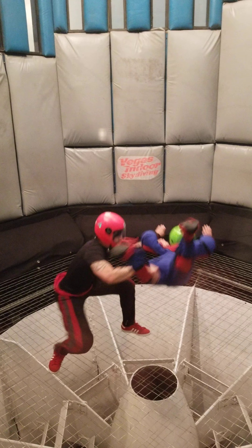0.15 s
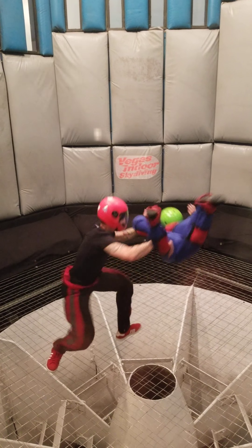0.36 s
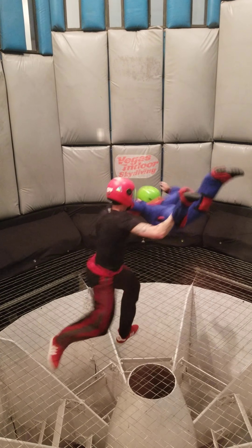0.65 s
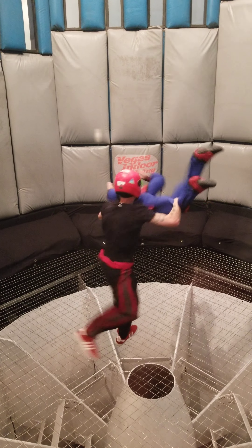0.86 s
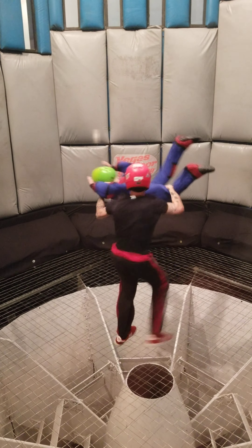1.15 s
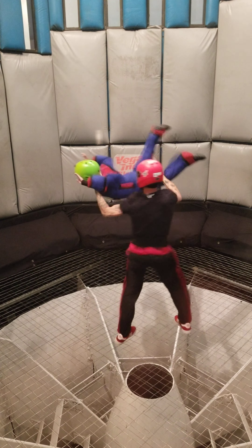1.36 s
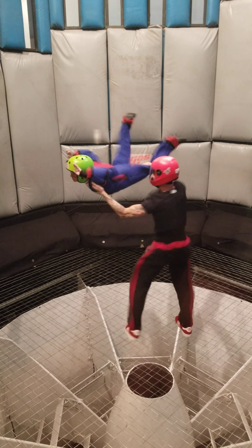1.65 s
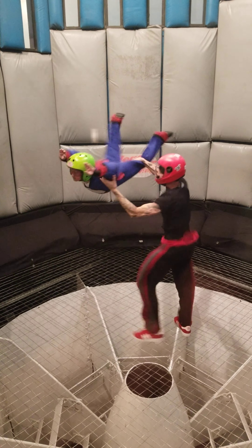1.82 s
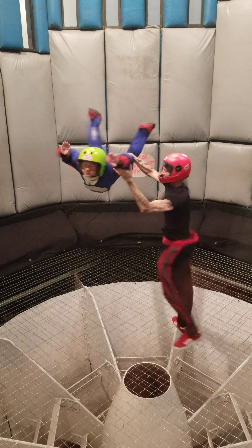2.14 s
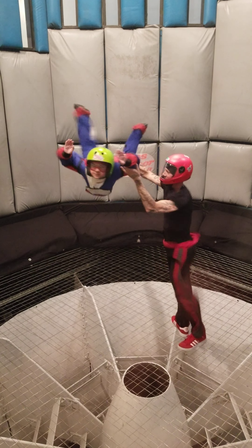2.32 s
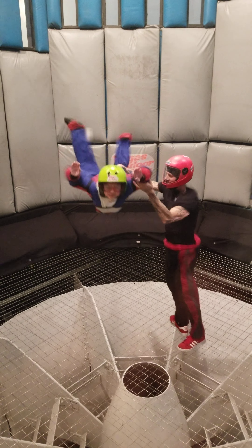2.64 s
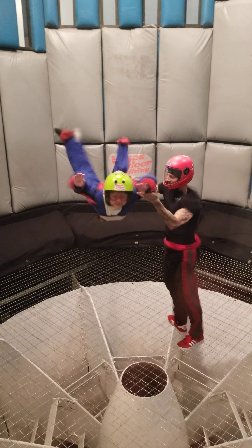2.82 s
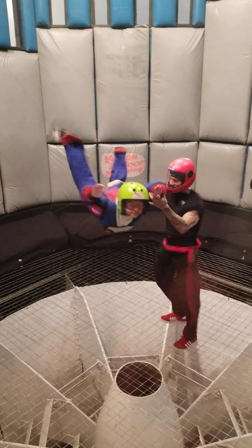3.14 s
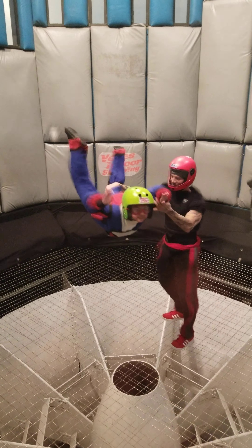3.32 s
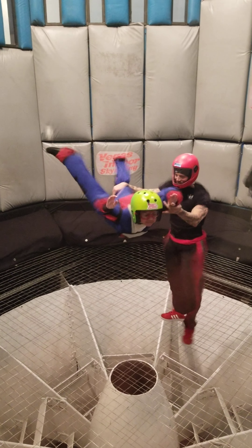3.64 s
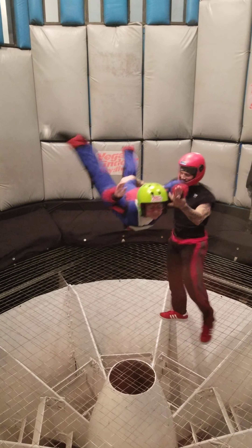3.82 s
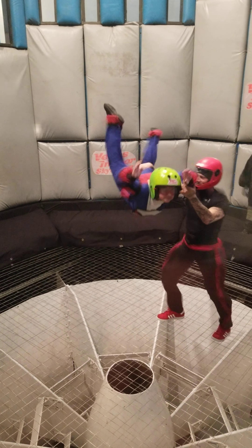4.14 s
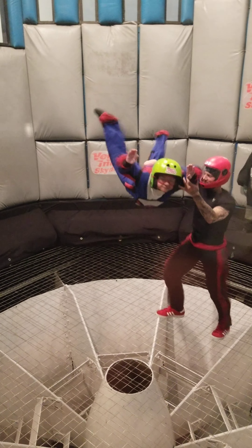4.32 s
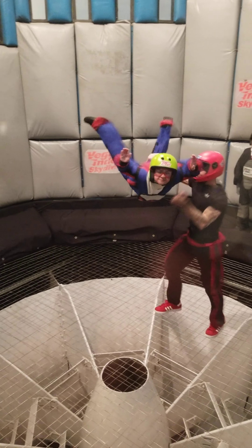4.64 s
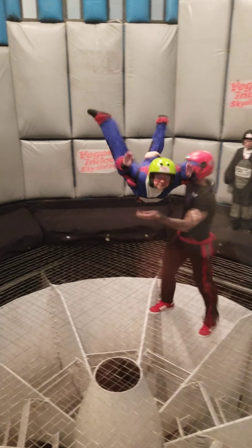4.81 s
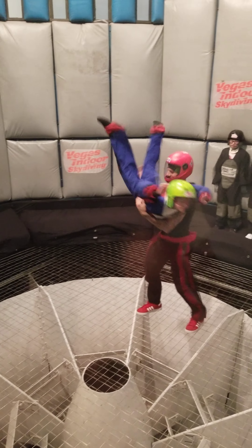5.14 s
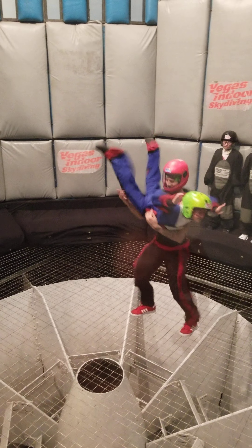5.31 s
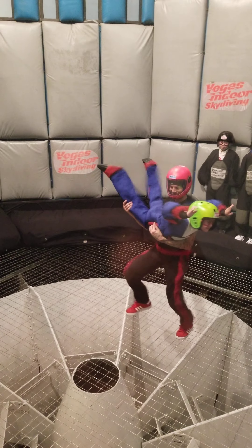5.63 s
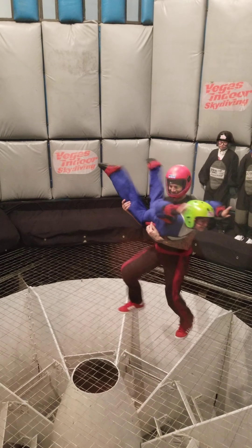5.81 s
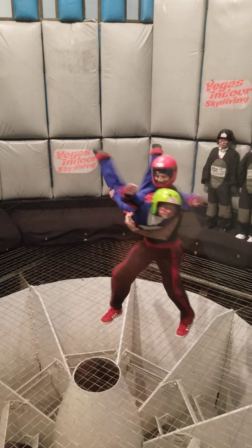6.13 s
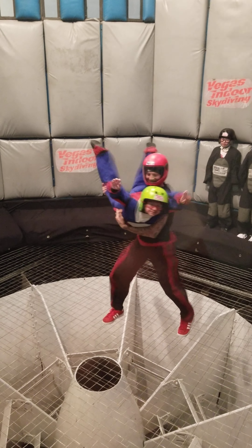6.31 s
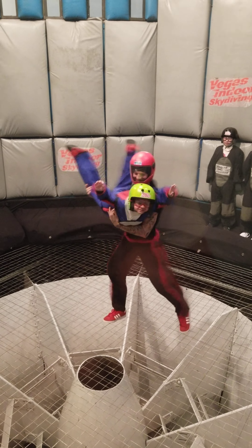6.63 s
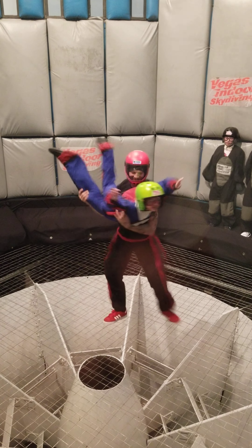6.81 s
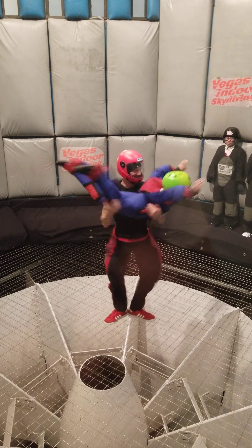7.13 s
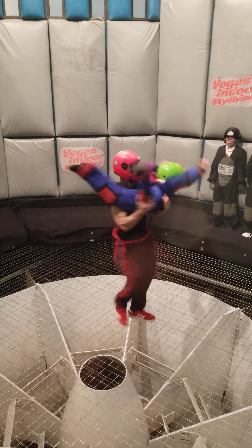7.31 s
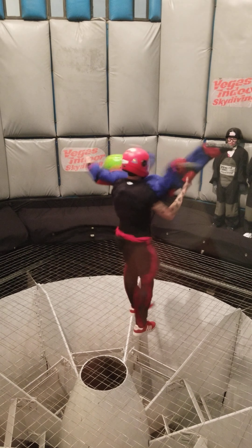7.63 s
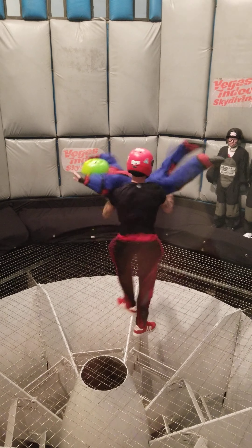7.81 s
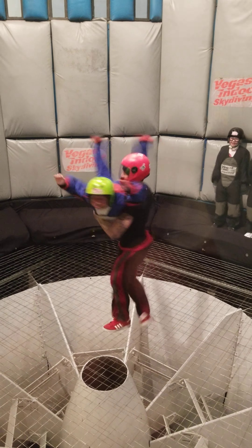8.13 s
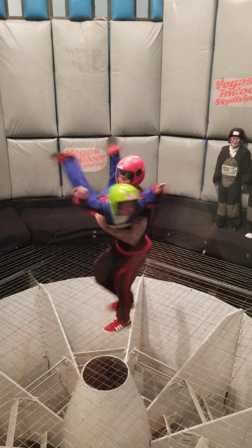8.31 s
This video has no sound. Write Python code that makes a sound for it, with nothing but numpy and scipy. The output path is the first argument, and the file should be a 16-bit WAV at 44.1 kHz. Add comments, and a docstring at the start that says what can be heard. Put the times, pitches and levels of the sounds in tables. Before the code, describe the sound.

Large fans in an indoor vertical wind tunnel make a deep, throbbing hum under a loud, steady rush of air.

```python
"""Inside a vertical wind tunnel

A big propeller turns under the floor net of a padded flight chamber. Its blades beat out a deep hum
whose overtones swell and fade as two flyers move through the air column. Turbulence roars around the
hum, and air rushes through the net and past the suits. Midway, the listener moves to a second spot."""
import sys
import numpy as np
from scipy import signal
from scipy.fft import rfft, irfft, next_fast_len
from scipy.io import wavfile
from scipy.ndimage import uniform_filter1d, minimum_filter1d

SR = 44100
rng = np.random.default_rng(int(sys.argv[2]) if len(sys.argv) > 2 else 0)


def waveform_to_disk(signal):
    """Save audio, clipped to [-1, 1], as 16-bit WAV at the path in sys.argv[1]."""
    frames = np.transpose(np.atleast_2d(signal))
    scaled = np.clip(frames, -1, 1) * 32767
    samples = np.round(scaled).astype(np.int16)
    wavfile.write(sys.argv[1], SR, samples)


N = 373086


def from_db(db):
    """Amplitude ratio of a level."""
    return 10 ** (np.asarray(db) / 20)


def unit_power(x):
    """Normalisation to a mean square of 1."""
    return x / np.sqrt(np.mean(np.abs(x) ** 2) + 1e-20)


def in_time(points):
    """Linear interpolation in time, sample by sample."""
    return np.interp(np.arange(N) / SR, *np.transpose(points))


def at_hz(points, hz):
    """Interpolation on a log-frequency axis."""
    known_hz, values = np.transpose(points)
    return np.interp(np.log(np.maximum(hz, 1)), np.log(known_hz), values)


def drift(rate_hz):
    """Low-pass Gaussian noise: a slow fluctuation of unit power."""
    hop = 40
    pole = np.exp(-2 * np.pi * hop * rate_hz / SR)
    slow = signal.lfilter([1], [1, -2 * pole, pole * pole], rng.standard_normal(N // hop + 2002))[2000:]
    return np.interp(np.arange(N) / hop, np.arange(len(slow)), unit_power(slow))


def panned(balance_db):
    """Interaural level difference as two gains whose mean is 1."""
    gains = from_db(np.array([[.5], [-.5]]) * balance_db)
    return gains / gains.mean(axis=0)


def way_moved(pace, start_s=3.73):
    """Standing waves make the sound depend on position: 0 at the first spot, 1 at the second."""
    return np.clip(pace * (np.arange(N) / SR - start_s) / 1.34, 0, 1)


# Level of the air noise, left ear minus right: f/Hz, difference/dB
EAR_BALANCE = [(50, 4), (200, 3), (400, 7), (560, 1.5), (760, 6), (1050, 4), (1380, -2.5), (1600, 1),
               (2150, 1), (2700, 3.5), (3150, 1), (4200, 6.5), (5900, 7), (6500, 3), (10000, 1)]
# Likeness of the two ears: f/Hz, correlation coefficient
EAR_CORRELATION = [(100, .97), (200, .93), (300, .72), (450, .48), (680, .2), (1020, -.16), (1520, -.17),
                   (2280, 0), (3400, .11), (5100, .08)]
def air_noise(spectrum):
    """Partial coherence: coloured noise, alike at both ears in the bass and unrelated in the treble."""
    size = next_fast_len(N)
    hz = np.fft.rfftfreq(size, 1 / SR)
    mid, side = rfft(rng.standard_normal((2, size)))
    alike = at_hz(EAR_CORRELATION, hz)
    ears = np.sqrt(1 + alike) * mid + np.sqrt(1 - alike) * side * [[1], [-1]]
    top_hz = spectrum[-1][0]
    colour = from_db(at_hz(spectrum, hz)) / np.maximum(1, hz / top_hz) ** 6
    noise = irfft(ears * panned(at_hz(EAR_BALANCE, hz)) * colour, size)[:, :N]
    return noise / np.std(noise.mean(axis=0))


def airstream(spectrum, level_db, blade_angle, throb, gust_db):
    """Amplitude modulation: turbulent noise gusts, and pulses with every passing blade."""
    return air_noise(spectrum) * from_db(level_db + gust_db * drift(9.6)) * (1 + throb * np.cos(blade_angle))


def walls(sound, echo_db, count=8):
    """Comb filtering: weak reflections from the padded walls reach each ear with different delays."""
    lags = (rng.uniform(.002, .022, (2, count)) * SR).astype(int)
    echoes = [sum(np.roll(ear, lag) for lag in ear_lags) for ear, ear_lags in zip(sound, lags)]
    return sound + from_db(echo_db) * np.array(echoes)


# Spectrum of the fine hiss: f/Hz, relative level/dB
FINE_HISS_SPECTRUM = [(6500, -11.5), (8300, -6), (9700, -2), (11200, -0.5), (13000, -4), (14000, -2),
                      (15500, -6.5)]
def fine_hiss(flow_db, moved, blade_angle):
    """Flow noise has a faint tail in the high treble."""
    level_db = flow_db - 25 + .54 * moved
    return airstream(FINE_HISS_SPECTRUM, level_db, blade_angle, throb=.046, gust_db=.5)


# Resonances of the air stream: f/Hz, half-width/Hz, relative level/dB
WHISTLE_MODES = [(3362, 79, 1.5), (3610, 200, -3)]
def whistle(flow_db, moved, blade_angle):
    """Resonance: the stream sings in narrow bands, louder at the second spot."""
    hz = np.geomspace(20, SR / 2, 1500)
    gain = sum(from_db(db) / (1 + ((hz - centre) / width) ** 2) for centre, width, db in WHISTLE_MODES)
    spectrum = np.column_stack([hz, 20 * np.log10(gain)])
    return airstream(spectrum, flow_db - 12.5 + 5.3 * moved, blade_angle, throb=.033, gust_db=.5)


# Spectrum of the hiss: f/Hz, relative level/dB
HISS_SPECTRUM = [(2000, -26), (2500, -9), (2800, -5.5), (3150, -1.5), (3500, -2), (3900, -3.5),
                 (4200, -2.5), (4800, -12), (5400, -13.5), (5950, -18), (6450, -16.5), (7300, -24.5),
                 (8200, -38.5), (11000, -58.5)]
def hiss(flow_db, moved, blade_angle):
    """Flow noise at the net and the suits: the treble band."""
    return airstream(HISS_SPECTRUM, flow_db - 4 - .8 * moved, blade_angle, throb=.038, gust_db=.6)


# Spectrum of the rush: f/Hz, relative level/dB
RUSH_SPECTRUM = [(600, -27), (850, -1.5), (1020, -1.5), (1130, -1.5), (1350, -0.5), (1500, 2.5),
                 (1700, -4.5), (2000, -7), (2400, -12.5), (3000, -16.5), (4500, -45)]
def rush(flow_db, moved, blade_angle):
    """Flow noise at the net and the suits: the middle band."""
    return airstream(RUSH_SPECTRUM, flow_db - 3 - .5 * moved, blade_angle, throb=.13, gust_db=.14)


# Spectrum of the roar: f/Hz, relative level/dB
ROAR_SPECTRUM = [(20, -15), (45, -14.5), (75, -3), (120, -2.5), (150, 1), (200, 6.5), (255, 2), (330, -8),
                 (420, -2.5), (500, -7), (590, -7.5), (720, -9.5), (830, -17.5), (1100, -28.5)]
def roar(turbulence_db, blade_angle):
    """Turbulence round the blades radiates low broadband noise."""
    return airstream(ROAR_SPECTRUM, turbulence_db + 4.5, blade_angle, throb=.19, gust_db=.47)


def eddies(hz, flutter_hz=3.88):
    """Scattering by eddies gives a tone a random amplitude and phase at each ear."""
    alike = at_hz(EAR_CORRELATION, hz)
    mid, side = (unit_power(drift(flutter_hz) + 1j * drift(flutter_hz)) for _ in range(2))
    return mid + np.sqrt((1 - alike) / (1 + alike)) * side * [[1], [-1]]


# Blade harmonics: order, steady level/dB at the first spot, at the second, left minus right/dB,
# left phase lead/rad, scattered level/dB re turbulence
HARMONICS = [(1, -37.5, -43, 4.2, 0, -18), (2, .2, 0, 3.9, -.08, -9), (3, -20.7, -15.4, 3.5, 0, -1.5),
             (4, 0, -.8, 1, .1, -4), (5, -30.5, -25.2, -2, .1, -3), (6, -36, -25.2, 10, -1.1, -13),
             (7, -35.5, -37.5, 10, .3, -10.5), (8, -39, -34, 6.8, 0, -10.5), (9, -50, -42, 9, .4, -18),
             (10, -37, -39, 0, .7, -19), (11, -43.5, -40, .8, .3, -19), (12, -43, -41.3, 5.5, .6, -19),
             (13, -45.5, -41, 8, 2.2, -19), (14, -54, -52, 4, 1.5, -26), (16, -59, -54, 2, 1.5, -29)]
# Deep hum, added to the steady level of order 2: t/s, level/dB
HUM_ENVELOPE = [(0.0, -10), (0.69, -9.0), (3.18, -10), (3.78, -10.5), (6.28, -16), (6.71, -13.5),
                (7.01, -14.5), (8.02, -12.5), (8.46, -13.5)]
# Its octave, added to the steady level of order 4: t/s, level/dB
OCTAVE_ENVELOPE = [(0.0, -18.6), (0.83, -23.5), (1.31, -14.5), (1.61, -16.5), (2.36, -30), (2.86, -13),
                   (3.34, -18.9), (3.63, -15.5), (3.87, -18), (5.94, -30), (6.1, -19), (6.85, -29),
                   (7.05, -15.5), (7.81, -22.5), (8.02, -13.5), (8.46, -22)]
def blade_hum(turbulence_db, blade_angle, blade_hz):
    """Periodic pressure dips, one per blade, form a harmonic series of steady plus scattered parts."""
    envelopes_db = {2: in_time(HUM_ENVELOPE), 4: in_time(OCTAVE_ENVELOPE)}
    surge_db = turbulence_db - turbulence_db.mean()
    hum = np.zeros((2, N))
    for order, first_db, second_db, balance_db, lead_rad, scatter_db in HARMONICS:
        moved = way_moved(pace=order / 2)  # shorter waves change over sooner
        spot_db = first_db + moved * (second_db - first_db)
        # higher orders grow with the turbulence that the blades chop
        chopped_db = np.clip(.16 * (order - 2), 0, 1) * surge_db
        swell_db = envelopes_db.get(order, chopped_db + .87 * drift(.8))
        steady = from_db(spot_db + swell_db)
        scattered = from_db(turbulence_db + scatter_db) * eddies(order * blade_hz[0])
        # moving bodies sway the sound paths; reflections smear the dip, more at the first spot
        sway = order * .09 * drift(.45)
        smear = order * .29 * (1 - way_moved(pace=.89)) * rng.normal() + .44 * rng.normal()
        tone = (steady + scattered) * np.exp(1j * (order * blade_angle + sway + smear))
        ears = np.real(tone * np.exp(1j * lead_rad * np.array([[.5], [-.5]])))
        hum -= np.sqrt(2) * panned(balance_db) * ears
    return hum


# Blade-passing frequency: t/s, f/Hz
BLADE_RATE = [(0, 54.52), (4.15, 54.52), (4.75, 54.1), (5.7, 54.04), (8.46, 54.08)]
# Turbulence round the blades: t/s, level/dB
TURBULENCE_LEVEL = [(0.0, -30.5), (1.93, -27), (2.32, -29), (2.62, -26.5), (4.31, -28), (4.97, -30),
                    (5.22, -27), (6.81, -24.9), (8.46, -26)]
# Air stream through the net: t/s, level/dB
FLOW_LEVEL = [(0.0, -36), (3.42, -34.5), (3.73, -36), (4.87, -35.5), (5.64, -34), (7.61, -32.5),
              (8.12, -33.5), (8.46, -32)]
def scene():
    """Superposition of hum and air noise, all driven by one propeller."""
    blade_hz = in_time(BLADE_RATE)
    blade_angle = 2 * np.pi * np.cumsum(blade_hz) / SR
    turbulence_db, flow_db = in_time(TURBULENCE_LEVEL), in_time(FLOW_LEVEL)
    stream = (flow_db, way_moved(pace=1.6), blade_angle)
    roaring = roar(turbulence_db, blade_angle)
    air = rush(*stream) + hiss(*stream)
    whistling = whistle(*stream)
    air += fine_hiss(*stream)
    hum = blade_hum(turbulence_db, blade_angle, blade_hz)
    return hum + roaring + whistling + walls(air, echo_db=-20)


def limiter(sound, ceiling=.99, window=110):
    """Look-ahead limiting: the gain eases down before any peak that would pass the ceiling."""
    allowed = np.minimum(1, ceiling / (np.abs(sound).max(axis=0) + 1e-9))
    held = minimum_filter1d(allowed, 2 * window + 1)
    return sound * uniform_filter1d(uniform_filter1d(held, window), window)


def record(dry, cutoff_hz=15800):
    """Peak limiting, then low-pass filtering of the highest treble."""
    lowpass = signal.ellip(10, .05, 70, cutoff_hz, fs=SR, output="sos")
    return signal.sosfilt(lowpass, limiter(dry))


dry = scene()
out = record(dry)
waveform_to_disk(out)
```